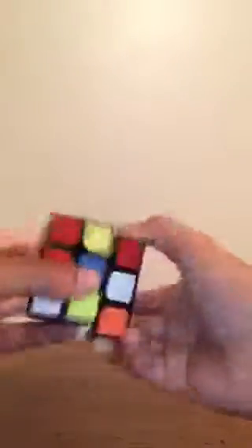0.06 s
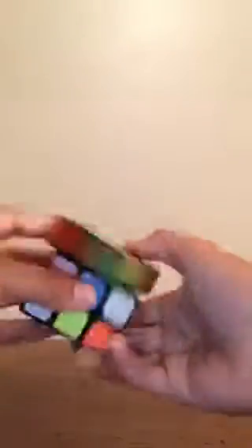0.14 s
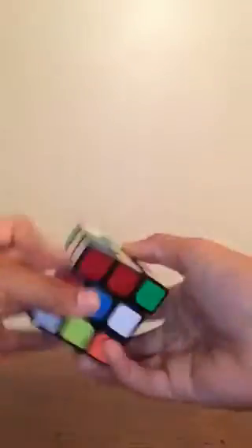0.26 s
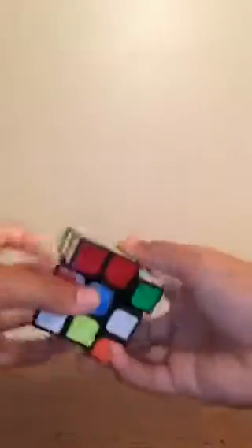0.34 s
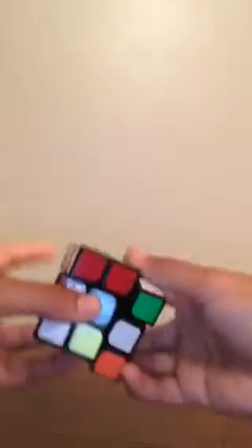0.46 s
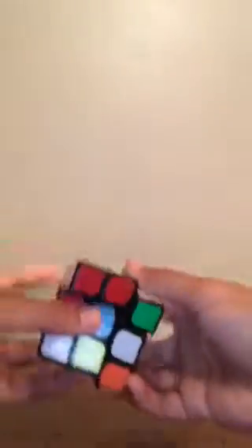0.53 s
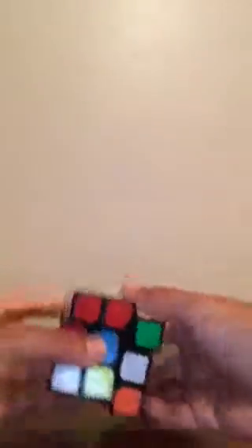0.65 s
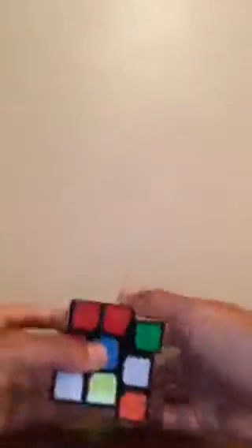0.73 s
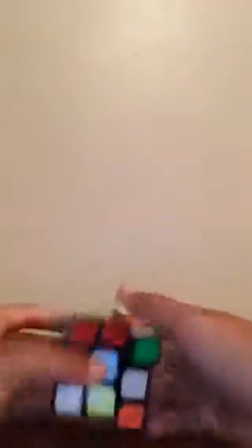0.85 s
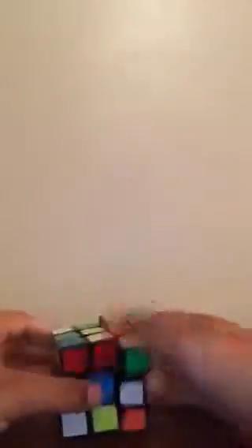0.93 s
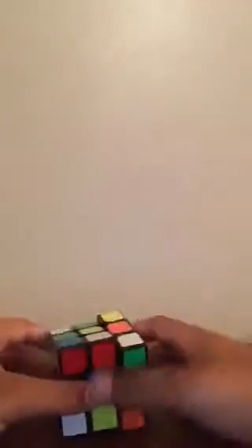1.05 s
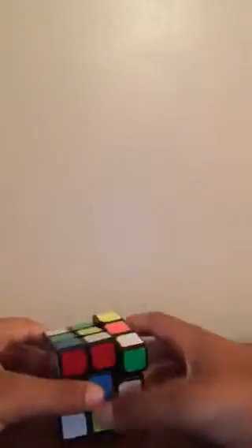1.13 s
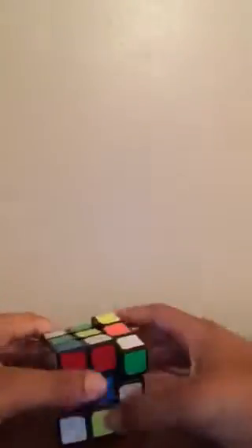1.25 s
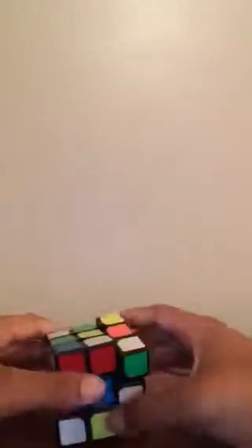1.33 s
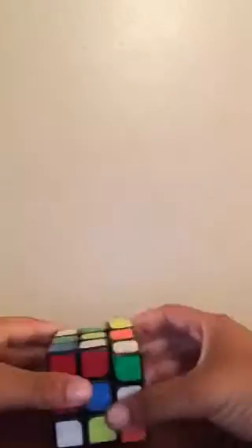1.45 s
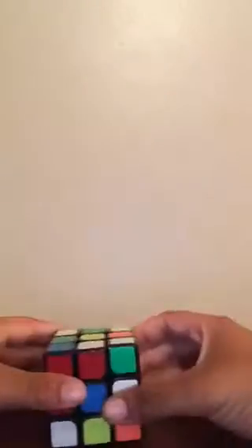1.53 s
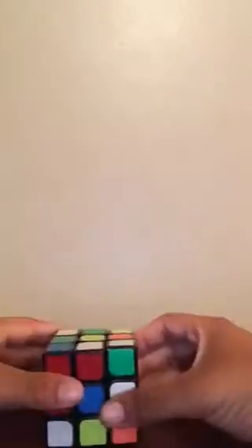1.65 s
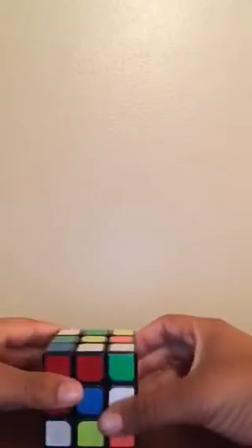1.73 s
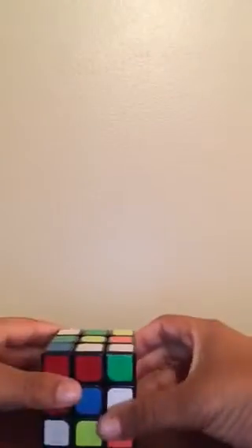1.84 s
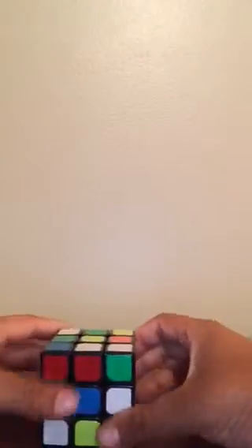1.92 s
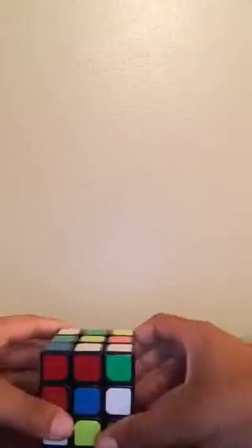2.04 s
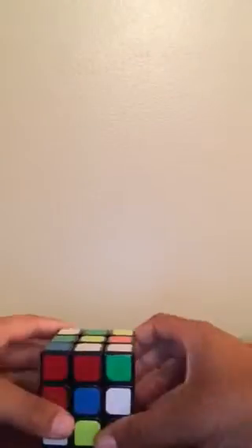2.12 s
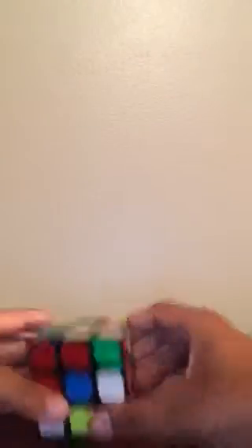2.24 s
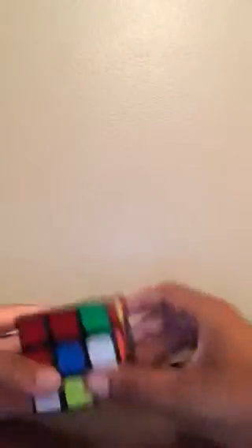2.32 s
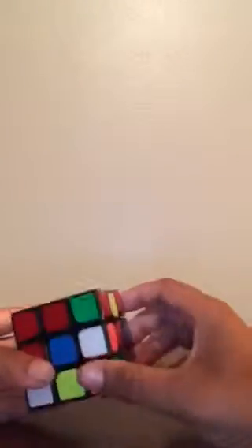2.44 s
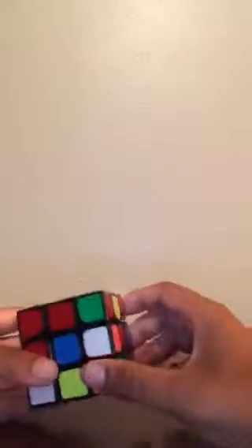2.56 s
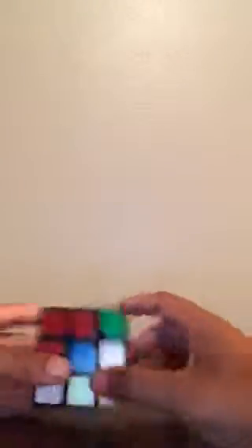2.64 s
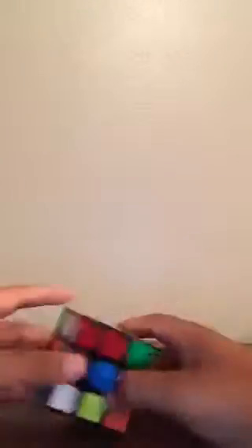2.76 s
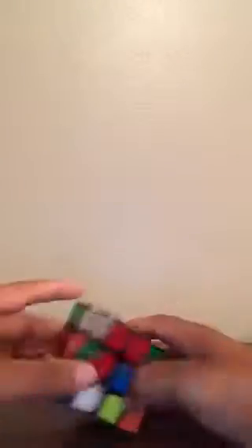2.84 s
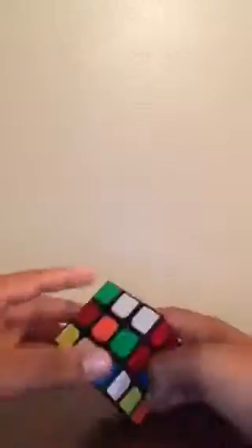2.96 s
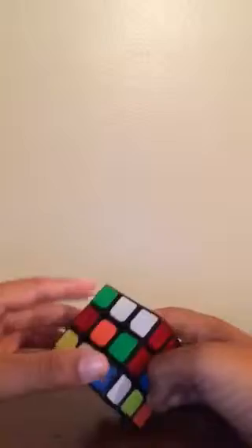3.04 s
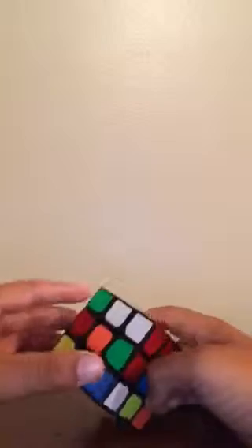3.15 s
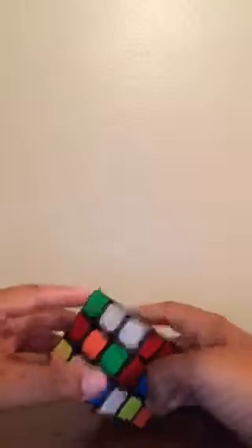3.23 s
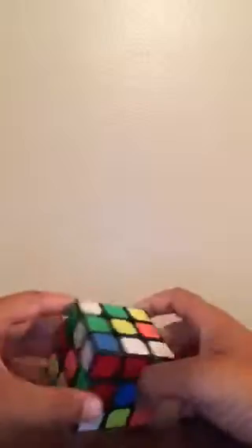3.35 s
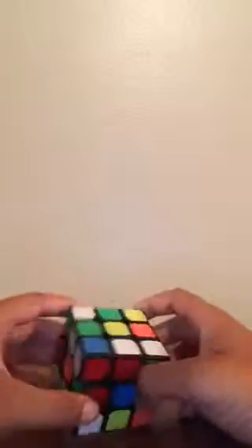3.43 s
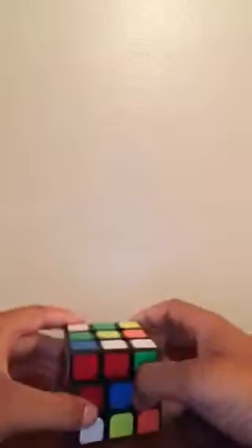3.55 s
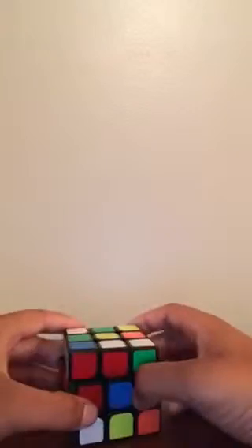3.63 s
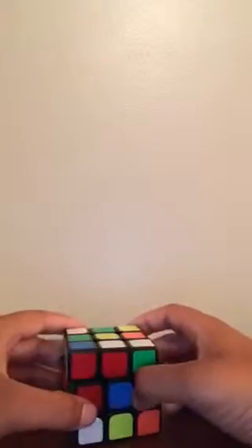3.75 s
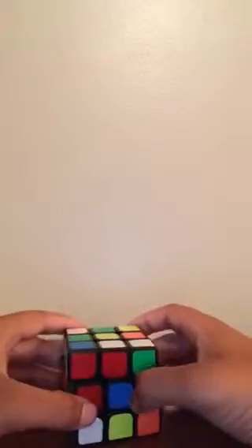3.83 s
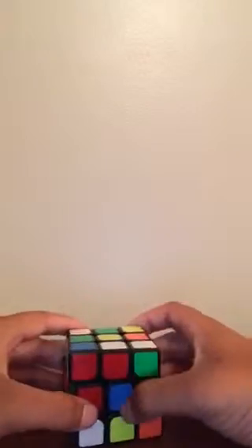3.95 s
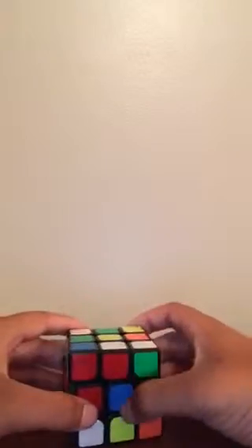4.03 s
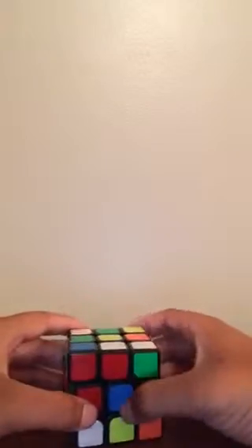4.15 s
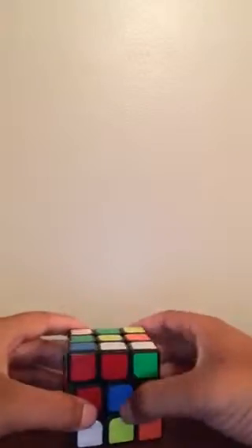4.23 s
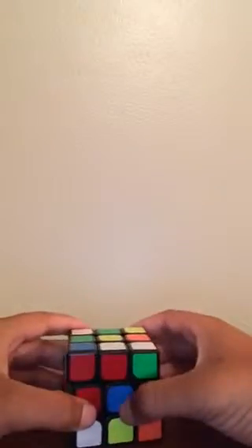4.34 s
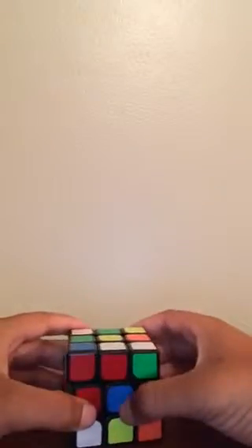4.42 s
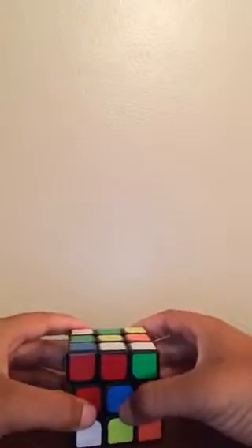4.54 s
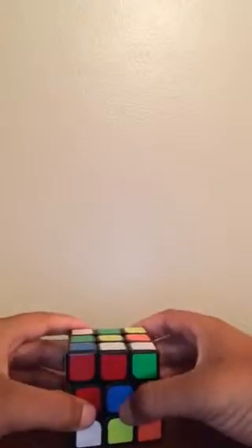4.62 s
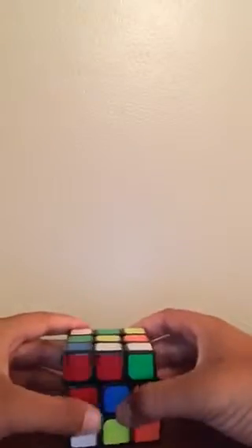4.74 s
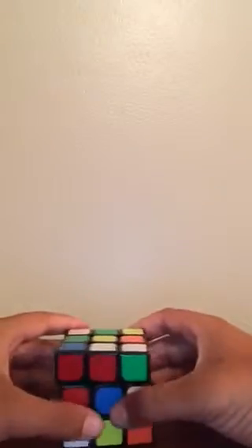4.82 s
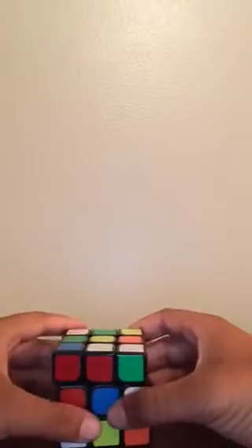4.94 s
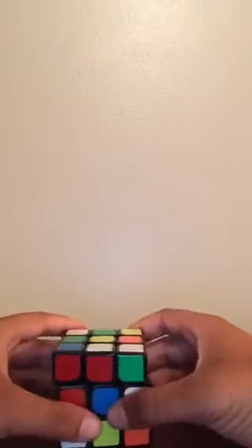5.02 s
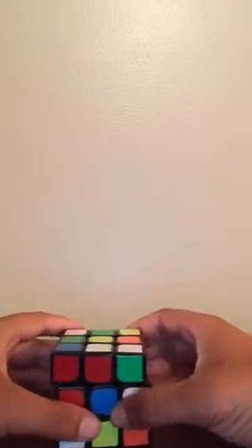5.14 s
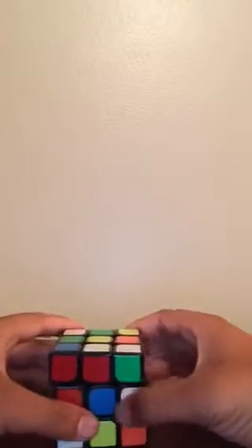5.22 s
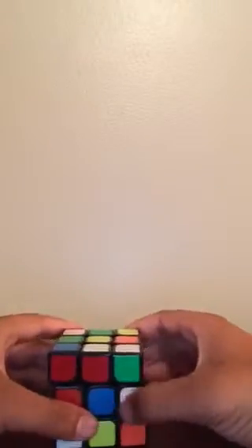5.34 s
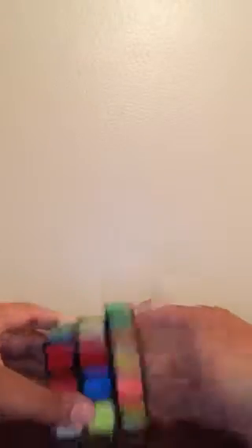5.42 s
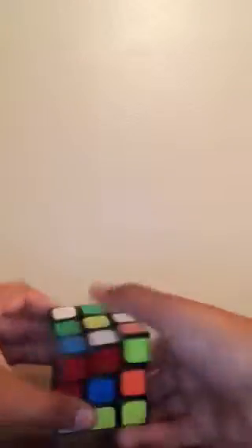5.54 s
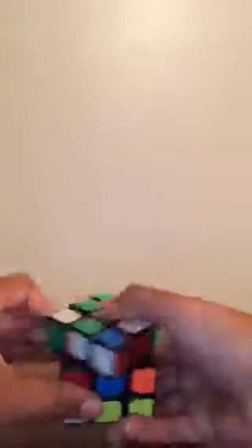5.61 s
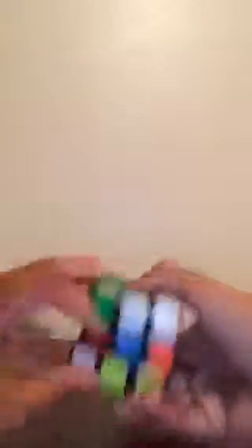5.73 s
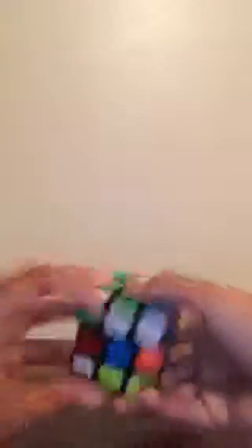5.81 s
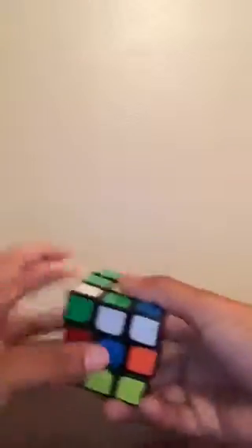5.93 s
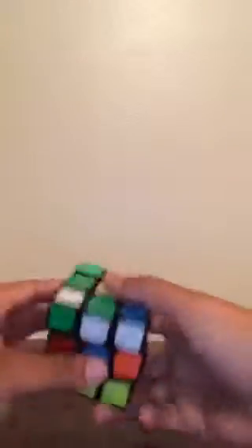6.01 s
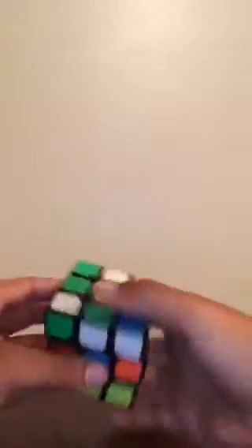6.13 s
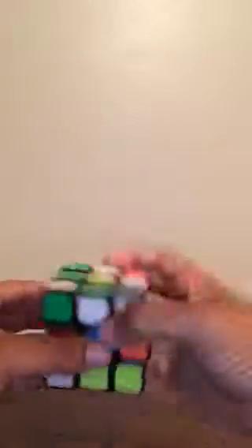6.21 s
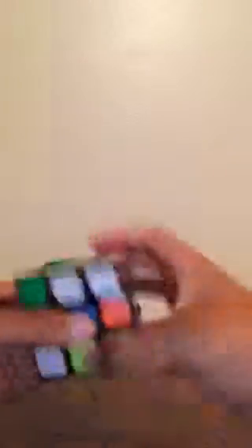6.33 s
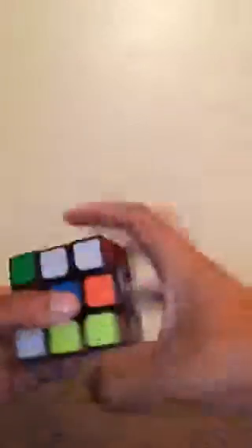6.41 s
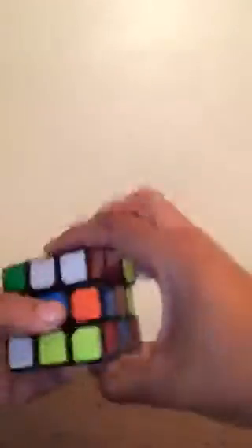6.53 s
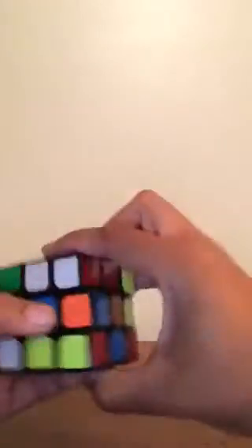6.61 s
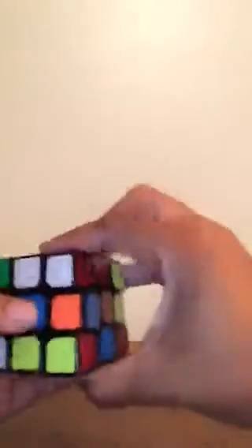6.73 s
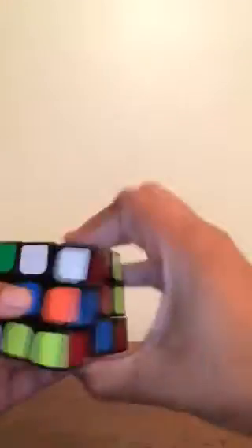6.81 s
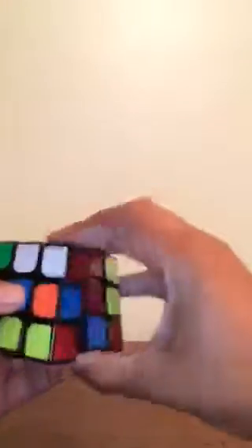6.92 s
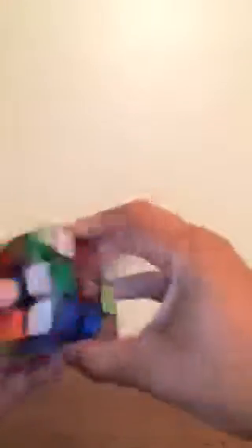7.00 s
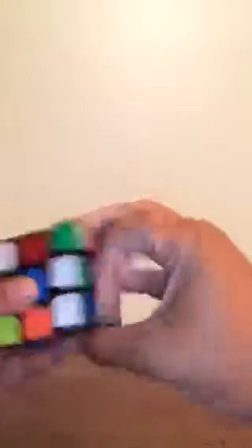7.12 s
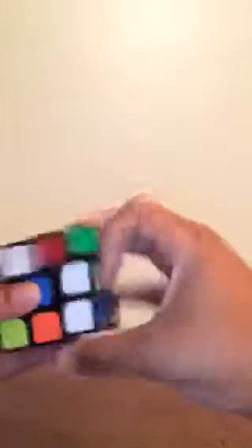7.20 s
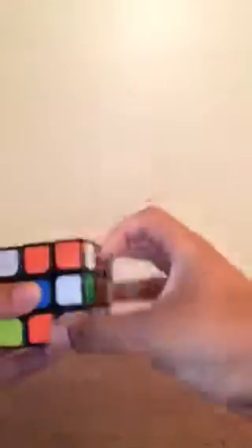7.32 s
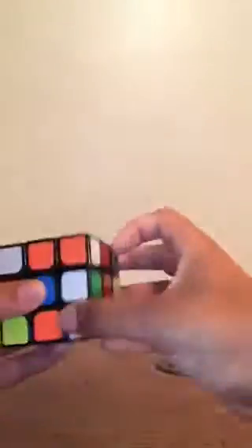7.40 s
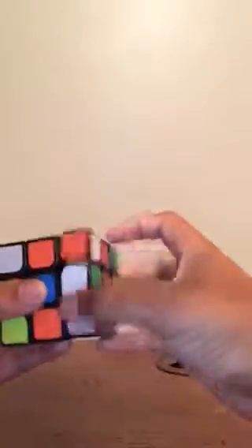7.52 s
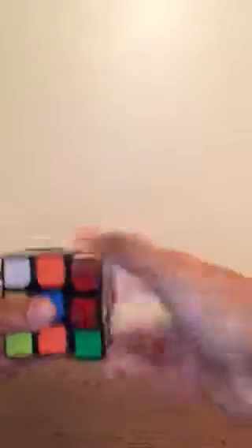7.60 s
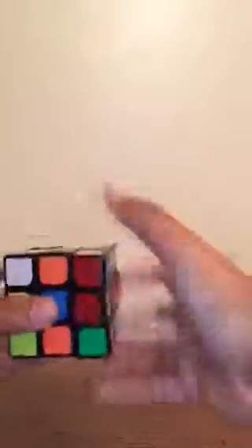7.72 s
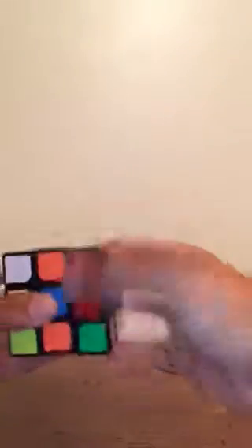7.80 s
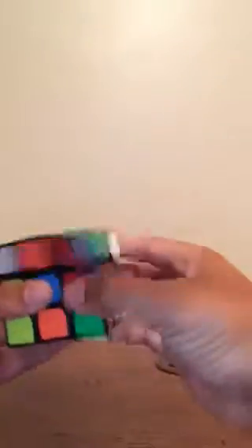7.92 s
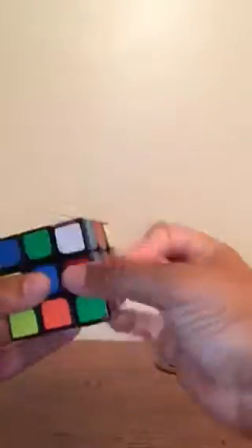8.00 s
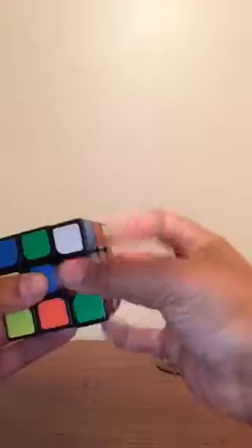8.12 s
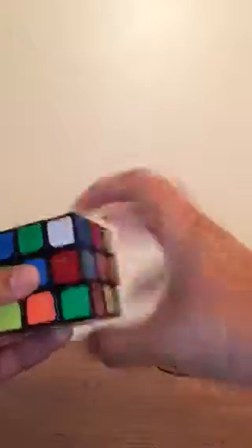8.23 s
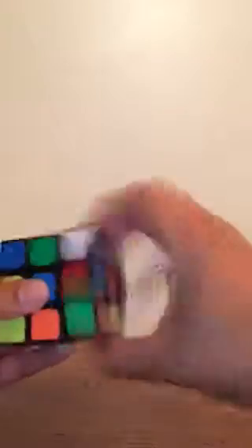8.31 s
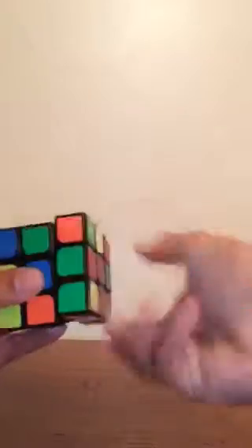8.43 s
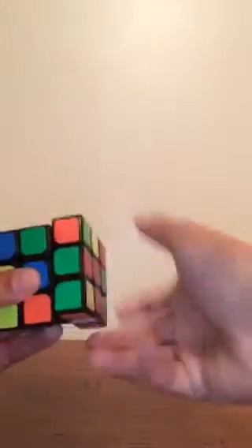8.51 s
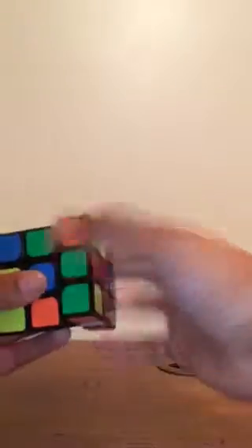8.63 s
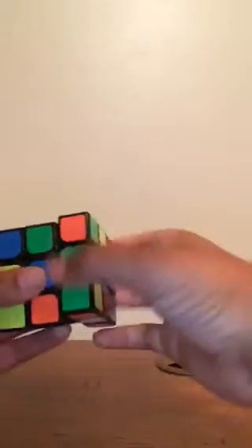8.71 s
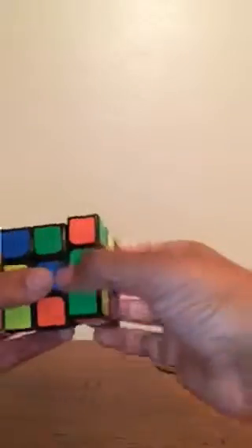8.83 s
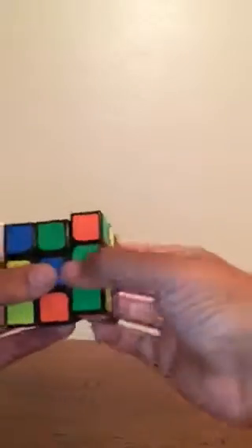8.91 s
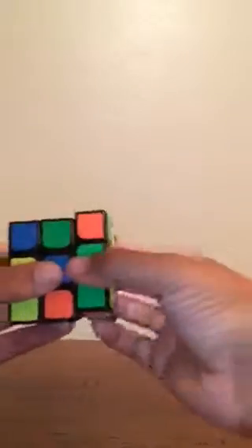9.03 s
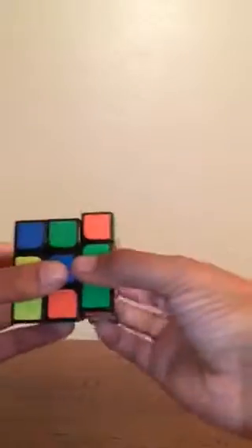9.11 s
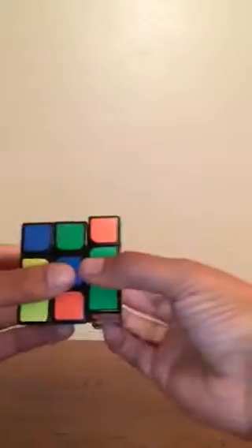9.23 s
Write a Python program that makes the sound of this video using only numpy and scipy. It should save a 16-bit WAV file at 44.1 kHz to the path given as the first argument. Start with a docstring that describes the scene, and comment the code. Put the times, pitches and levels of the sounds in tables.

```python
"""A plastic speedcube is turned by hand close by, in a small room with a low steady hum.
First comes a burst of turns: layers scrape, and loose pieces click as they catch and seat.
Then fingers tap and rub the faces, hands bump, and the cube is knocked on a wooden table.
From 5.5 s the clicks return; near 7 s a tight layer rasps and a dragged fingertip groans.
Dense volleys follow, then a few light contacts. Sounds are shaped noise and decaying sines."""
import sys
import numpy as np
from scipy import signal
from scipy.fft import rfft, irfft, next_fast_len
from scipy.io import wavfile
from scipy.ndimage import uniform_filter1d, map_coordinates

SR = 44100
rng = np.random.default_rng(int(sys.argv[2]) if len(sys.argv) > 2 else 0)


def dump(signal):
    """Clip the signal to [-1, 1] and save it as 16-bit WAV at the path in sys.argv[1]."""
    limited = np.clip(np.atleast_2d(signal).T, -1, 1)
    pcm = np.round(limited * 32767).astype(np.int16)
    wavfile.write(sys.argv[1], SR, pcm)


N = 408366
TIME_S = np.arange(N) / SR

# pieces catching or seating: start_s, level_db, brightness_db_per_octave, ringing_part
CLICKS = [(.058, -33, 1, "wall"), (.089, -28.5, 0, "hollow"), (.111, -33.5, 5.5, "wall"),
          (0.1225, -27, 1, "hollow"), (0.2661, -32, 1, "wall"), (0.2762, -28.5, -0.5, "hollow"),
          (0.2873, -28.5, 2, "wall"), (.298, -34.5, -1.5, "hollow"), (0.3134, -28.5, -0.5, "hollow"),
          (.365, -25, 2, "wall"), (0.3701, -18.5, 1.5, "hollow"), (0.4338, -40, 5, "wall"),
          (0.467, -34, -1.5, "hollow"), (.518, -38.5, .5, "wall"), (.6, -46.5, 2.5, "wall"),
          (0.651, -38.5, 1, "wall"), (0.745, -48, -0.5, "hollow"), (2.763, -47, 3.5, "wall"),
          (3.62, -31.5, 1.5, "wall"), (5.56, -26.5, -4.5, "shell"), (5.585, -17, 0.5, "hollow"),
          (5.593, -23, -0.5, "wall"), (5.651, -34.5, 0.5, "wall"), (5.7026, -26, -7.5, "hollow"),
          (5.7074, -26, 12.5, "shell"), (5.724, -32.5, 5, "wall"), (5.762, -28, -0.5, "hollow"),
          (5.774, -40, -2, "wall"), (5.815, -27, -2.5, "shell"), (5.848, -30.5, -5.5, "shell"),
          (5.865, -22, 1.5, "shell"), (5.876, -30.5, -9, "shell"), (5.895, -31, 0.5, "hollow"),
          (5.96, -33.5, -6, "shell"), (5.986, -36, 2, "wall"), (6.156, -39, -3, "hollow"),
          (6.2568, -38.5, 0, "hollow"), (6.3136, -38.5, -0.5, "hollow"), (6.439, -37.5, 4, "wall"),
          (6.626, -35.5, -4, "hollow"), (6.794, -44, -1.5, "wall"), (6.865, -45.5, 3, "wall"),
          (6.954, -37, 1, "wall"), (6.9753, -32.5, -0.5, "hollow"), (6.989, -32, 1, "hollow"),
          (7.069, -44.5, -2.5, "wall"), (7.16, -18.5, 1, "hollow"), (7.168, -22, 4, "hollow"),
          (7.1798, -20, 7, "wall"), (7.183, -21.5, 3, "hollow"), (7.2, -32.5, 5, "hollow"),
          (7.2912, -37, .5, "hollow"), (7.306, -30, -1, "hollow"), (7.3525, -28, 6, "wall"),
          (7.363, -22, 6, "shell"), (7.369, -14.5, 4.5, "wall"), (7.3738, -20.5, 3.5, "wall"),
          (7.393, -16, 4, "wall"), (7.3959, -20.5, 7.5, "shell"), (7.574, -37, -1.5, "hollow"),
          (7.6895, -23.5, 0.5, "hollow"), (7.7051, -37, 0, "hollow"), (7.7273, -22.5, 1.5, "wall"),
          (7.7602, -27, 0.5, "shell"), (8.0156, -49, -0.5, "wall"), (8.092, -29, -1, "wall"),
          (8.113, -27.5, 0.5, "hollow"), (8.131, -21.5, 1.5, "hollow"), (8.1399, -20.5, 0.5, "hollow"),
          (8.146, -16.5, 8.5, "wall"), (8.3218, -52, 1.5, "wall"), (8.441, -39.5, -1, "shell"),
          (8.473, -23, -0.5, "shell"), (8.495, -15.5, 3.5, "wall"), (8.5115, -15.5, 2.5, "wall"),
          (8.523, -23.5, 2, "wall"), (8.533, -18, 1.5, "hollow"), (8.769, -47, 0.5, "wall"),
          (8.911, -41, 3, "wall"),]
# parts of the cube that a click rings: pitch_hz, level_db (against the click), t60_s
PARTS = {"shell": (1270, 6.1, 0.014), "hollow": (2760, 6, 0.015), "wall": (7100, -3, .008)}
# layers sliding on each other: start_s, end_s, level_db (relative)
SLIDES = [(-.03, .052, -49), (.057, .139, -41), (.275, .34, -32.5), (.345, .44, -46.5), (5.515, 5.625, -32),
          (5.617, 5.911, -47), (5.92, 6.081, -53), (6.74, 6.95, -54), (6.96, 7.03, -46.5),
          (7.125, 7.215, -32.5), (7.31, 7.41, -35.5), (7.456, 7.6, -52), (7.69, 7.78, -39),
          (8.089, 8.16, -39.5), (8.465, 8.551, -36)]
# whole cube set down, tapped or jolted:
# start_s, clack_db, table_db, shell_ring_hz, hand_thud_db (levels relative)
KNOCKS = [(1.0766, -11.5, -26, 3320, -34), (1.087, -14.5, -21, 2260, -29), (1.548, -41, -39.5, 1290, -58),
          (1.731, -36.5, -38.5, 1530, -40), (1.8876, -36, -39.5, 2795, -51),
          (2.8598, -12.5, -21, 2880, -40), (2.942, -26.5, -39, 1416, -39),
          (3.2229, -41.5, -35.5, 1650, -37.5), (3.619, -25.5, -26, 1466, -34),
          (3.7834, -45, -43.5, 1323, -53), (5.534, -21.5, -30.5, 2287, -41)]
# modes of the wooden table: pitch_hz, level_db (relative), t60_s
TABLE_MODES = [(238, -7.5, .05), (353.7, 2, 0.089), (403, 1, .07)]
# fingertips landing on a face: start_s, level_db
TAPS = [(.223, -42), (.863, -48.5), (1.012, -34), (1.835, -45), (2.09, -46.5), (2.346, -55),
        (2.3812, -46.5), (2.445, -48), (2.621, -59), (3.3963, -48), (3.417, -48), (3.456, -38),
        (4.574, -51), (5.299, -58.5), (6.216, -49.5), (6.58, -48.5), (8.2762, -46), (9.209, -53.5)]
# fingers brushing the faces: start_s, end_s, level_db (relative)
RUBS = [(1.01, 1.56, -61.5), (1.47, 1.73, -55.5), (2.4, 2.54, -53.5), (2.78, 2.87, -58), (3.38, 3.5, -58),
        (3.99, 4.09, -60), (4.87, 5.02, -59)]
# tight layer rasping: start_s, end_s, level_db
SQUEAK = (6.885, 6.935, -48)
# soft bumps of the hands alone: start_s, level_db (relative)
BUMPS = [(.864, -45.5), (1.207, -33), (1.245, -39), (1.397, -44), (1.43, -43), (2.428, -37), (2.466, -37.5),
         (8.15, -44.5), (8.339, -40)]
# colour of one loose piece: frequency_hz, level_db (relative)
PIECE_COLOUR = [(100, -24), (700, -14.5), (1300, -5), (1800, -9), (3000, -5.5), (5300, -9.5), (7500, -7),
                (9000, -15.5), (15000, -27.5)]
# colour of the whole cube: frequency_hz, level_db (relative)
CUBE_COLOUR = [(150, -17.5), (600, -7.5), (900, -11), (1400, 0.5), (3000, -1), (4000, -5.5), (7600, -11.5),
               (15000, -34)]
# colour of skin on plastic: frequency_hz, level_db (relative)
SKIN_COLOUR = [(300, -26.5), (1400, 3.5), (2500, -4.5), (7000, -9), (15000, -25)]
# colour of the hands' thud: frequency_hz, level_db (relative)
HAND_COLOUR = [(20, -24.5), (60, -4), (170, 2), (420, -10.5), (750, -21.5), (1300, -24.5), (12000, -56.5)]
# colour of the room air: frequency_hz, level_db (relative)
AIR_COLOUR = [(25, -35), (59, -11.5), (96, -14), (140, -3.5), (349, -8), (410, -5.5), (666, -21.5),
              (1570, -29), (15500, -53)]
# narrow bands in the room's hum: centre_hz, level_db
HUM = [(141, -68), (416, -64)]
# decay of the room: frequency_hz, t60_s
ROOM_DECAY = [(200, 0.38), (3000, 0.21), (15000, 0.15)]

# graze just before a click, rebound just after: lead or lag, level against the click
GRAZE_S, GRAZE_DB = .004, -11
REBOUND_S, REBOUND_DB = .0033, -8
RUN_GAP_S = .07  # clicks closer than this belong to one run
# what graze and rebound lose for each dB that a click is below a hard one
SOFTER_DB_PER_DB, HARD_DB = 0.2, -18.5
# random ticks: rate, level against the slide, spread
TICKS_PER_S, TICK_DB, TICK_SCATTER_DB = 150, -2, 5.5
PITCH_SCATTER, UNEVEN_DB = .08, 3.8  # half range of log pitch; spread of wall resonances
TABLE_SCATTER = 0.017  # log-pitch spread: the modes shift with the spot that is struck
FACE_HZ, FACE_DB, FACE_T60_S = 1450, 4.5, 0.021  # closed cube under a fingertip
SQUEAK_HZ, SQUEAK_WIDTH_HZ = 3106, 2000
GROAN_S, GROAN_LENGTH_S, GROAN_RAMP_S = 7.035, 0.25, 0.05  # ramp at both ends
GROAN_HZ, GROAN_SAG_HZ_PER_S = 162, 260
GROAN_DB, GROAN_FADE_DB_PER_S = -34, 65
ROOM_DB, AIR_DB = -13.0, -51.5
TOP_HZ = 15600


def clicks():
    """Corner and edge pieces snap into line and rebound; within a run they also graze just before."""
    out, previous_s = np.zeros(N), -np.inf
    for start_s, level_db, bright, part in CLICKS:
        loose_db = level_db + looseness_db(level_db)
        timing = np.exp(rng.uniform(-.5, .5, 2))
        graze_s, rebound_s = np.array([GRAZE_S, REBOUND_S]) * timing
        contacts = [(start_s, level_db), (start_s + rebound_s, loose_db + REBOUND_DB)]
        if start_s - previous_s < RUN_GAP_S:
            contacts.append((start_s - graze_s, loose_db + GRAZE_DB))
        for contact_s, contact_db in contacts:
            contact = impact(PIECE_COLOUR, bright, t60_s=.009, uneven_db=UNEVEN_DB)
            add(out, contact_s, amp(contact_db) * contact)
        add(out, start_s, amp(level_db) * ring(*PARTS[part]))
        previous_s = start_s
    return out


def looseness_db(level_db):
    """How much a click of this level shakes its neighbours, against a hard click; never above 0."""
    return min(SOFTER_DB_PER_DB * (level_db - HARD_DB), 0)


def ring(pitch_hz, level_db, t60_s):
    """One part of the cube rings briefly as a decaying sine, its pitch scattered at each call."""
    t = np.arange(SR // 25) / SR
    scattered_hz = pitch_hz * np.exp(PITCH_SCATTER * rng.uniform(-1, 1))
    onset = 1 - np.exp(-t / 0.00047)
    return amp(level_db - 60 * t / t60_s) * np.sin(2 * np.pi * scattered_hz * t) * onset


def ticks(count=2200):
    """Loose pieces tick at random, each with its own colour, as hard as the layers slide."""
    out, effort = np.zeros(N), strokes(SLIDES)
    keep_chance = TICKS_PER_S * N / SR / count
    draws = np.c_[rng.random((count, 2)), rng.standard_normal((count, 2))]
    for place, chance, size, bright in draws:
        if chance < keep_chance:
            tick = impact(PIECE_COLOUR, 3 * bright - 1, t60_s=0.007, uneven_db=6.5, size=512)
            tick_db = TICK_DB + TICK_SCATTER_DB * min(size, 1)
            add(out, place * N / SR, effort[int(place * N)] * amp(tick_db) * tick)
    return out


def slides():
    """Sliding layers scrape faintly; pieces also scrape just before they seat and chatter after."""
    t = np.arange(-SR // 20, SR // 20) / SR
    swell = np.where(t < 0, np.exp(t / 0.01), np.exp(-t / 0.007))
    seating = np.zeros(N)
    for start_s, level_db, *_ in CLICKS:
        before_gain = np.where(t < 0, amp(looseness_db(level_db)), 1)
        add(seating, start_s + t[0], amp(level_db - 15.0) * swell * before_gain)
    scrape = coloured(slips(rate_per_s=380, spread_db=24.5, life_s=0.0005, bed_db=-16.5), PIECE_COLOUR)
    return (amp(-5) * strokes(SLIDES) + seating) * scrape


def knocks(count=4):
    """The whole cube clacks and rings briefly, and the table top booms under it."""
    out, t = np.zeros(N), np.arange(SR // 4) / SR
    for start_s, clack_db, table_db, ring_hz, _ in KNOCKS:
        # harder blows are brighter
        clack = impact(CUBE_COLOUR, 0.17 * (clack_db + 10.0), t60_s=.015, uneven_db=1)
        add(out, start_s, amp(clack_db - 2) * clack)
        # near-equal pieces ring together, each a little off the others
        pitches_hz = ring_hz * np.exp(PITCH_SCATTER * rng.uniform(-1, 1, (count, 1)))
        shell = np.sin(2 * np.pi * pitches_hz * t).mean(0) * (1 - np.exp(-t / .0004))
        add(out, start_s, amp(clack_db + 4.5 - 60 * t / 0.028) * shell)
        # the jolt leaves the loose pieces buzzing in spurts around that note
        buzz = coloured(rng.standard_normal(len(t)), CUBE_COLOUR)
        buzz = buzz + .5 * wavering(ring_hz, 600, len(t))
        spurts = unit(buzz * amp(5.5 * wobble(140, len(t))))
        add(out, start_s, amp(clack_db - 21.5 - 60 * t / 0.18) * spurts)
        wood = np.zeros(len(t))
        for mode_hz, mode_db, t60_s in TABLE_MODES:
            decay = amp(mode_db + rng.normal(0, 1) - 60 * t / t60_s)
            shifted_hz = mode_hz * np.exp(TABLE_SCATTER * rng.standard_normal())
            wood += decay * np.sin(2 * np.pi * shifted_hz * t)
        add(out, start_s, amp(table_db + 4.5) * wood * (1 - np.exp(-t / 0.0028)))
    return out


def taps():
    """A fingertip lands on a face: a soft tick and the short, hollow note of the closed cube."""
    out = np.zeros(N)
    for start_s, level_db in TAPS:
        tick = impact(SKIN_COLOUR, 0, t60_s=0.0051, uneven_db=UNEVEN_DB)
        add(out, start_s, amp(level_db) * tick)
        add(out, start_s, amp(level_db) * ring(FACE_HZ, FACE_DB, FACE_T60_S))
    return out


def squeak():
    """A tight layer binds for an instant and rasps at one of the cube's resonances."""
    return strokes([SQUEAK]) * wavering(SQUEAK_HZ, SQUEAK_WIDTH_HZ)


def groan():
    """Skin sticks and slips on the face, slower and softer until the finger comes to rest."""
    t = np.clip(TIME_S - GROAN_S, 0, GROAN_LENGTH_S)
    pitch_hz = (GROAN_HZ - GROAN_SAG_HZ_PER_S * t) * (1 + 0.024 * wobble(90))
    phase = 2 * np.pi * np.cumsum(pitch_hz) / SR
    # half pitch: alternate slips differ in size
    wave = np.sin(phase) + amp(-13.5) * (np.sin(2 * phase) + np.sin(phase / 2))
    gate = np.minimum(np.minimum(t, GROAN_LENGTH_S - t) / GROAN_RAMP_S, 1)
    level_db = GROAN_DB - GROAN_FADE_DB_PER_S * t + 1.9 * wobble(60)
    return gate * amp(level_db) * unit(wave)


def rubs():
    """Skin drags over the faces in small, uneven catches, duller than plastic on plastic."""
    catches = slips(rate_per_s=300, spread_db=14, life_s=.0018, bed_db=-5)
    return strokes(RUBS) * coloured(catches, SKIN_COLOUR)


def bumps():
    """Flesh on wood and plastic: dull, shuddering thuds, and one short push behind each knock."""
    out, t = np.zeros(N), np.arange(SR // 4) / SR
    fade = amp(-60 * t / .15) * (1 - np.exp(-t / .002))
    for start_s, level_db in BUMPS:
        thud = coloured(rng.standard_normal(len(t)), HAND_COLOUR)
        add(out, start_s, amp(level_db + 6.0) * fade * thud)
    for start_s, *_, thud_db in KNOCKS:
        push = impact(HAND_COLOUR, 0, t60_s=0.022, uneven_db=3)
        add(out, start_s, amp(thud_db + 10.0) * push)
    return out


def room(x, wet_db, answers=8):
    """The walls answer with decaying noise; the answer changes as the cube moves about in the hands."""
    out = np.zeros(N)
    for k in range(answers):
        hz, t, bins = signal.stft(rng.standard_normal(SR // 2), SR, nperseg=256)
        decay = amp(-60 * t / along(ROOM_DECAY, hz)[:, None]) * (1 - np.exp(-t / 0.0051))
        tail = signal.istft(bins * decay, SR, nperseg=256)[1]
        # whole seconds split into equal slots, each answer taking its slot in turn
        here = (TIME_S * answers).astype(int) % answers == k
        out += signal.oaconvolve(x * here, tail / np.linalg.norm(tail))[:N]
    return amp(wet_db) * out


def air():
    """Steady low room noise with two wavering bands of hum."""
    hum = sum(amp(level_db) * wavering(centre_hz, 25) for centre_hz, level_db in HUM)
    return amp(AIR_DB) * coloured(rng.standard_normal(N), AIR_COLOUR) + hum


def impact(colour, bright, t60_s, uneven_db, size=2048, count=48):
    """One contact: a snap and brief chatter through hollow plastic; energy of 5 ms at rms 1."""
    t, hz = np.arange(size) / SR, np.fft.rfftfreq(size, 1 / SR)
    chatter_db = 2.9 * rng.standard_normal(size) - 60 * t / t60_s
    force = rfft(rng.standard_normal(size) * amp(chatter_db) * (1 - np.exp(-t / 0.00024)))
    # hard contacts drive all bands alike; the piece and its own wall resonances give the colour
    flatten_db = -10 * np.log10(np.abs(uniform_filter1d(np.abs(force) ** 2, size=40)) + 1e-9)
    knots = np.linspace(np.log(300), np.log(16000), count)
    walls = np.interp(np.log(hz + 1), knots, rng.standard_normal(count))
    tilt_db = bright * np.log2(np.clip(hz, 1000, 11000) / 4000)
    gain_db = along(colour, hz) + flatten_db + uneven_db * walls + tilt_db
    # minimum phase: folded forward, so that nothing rings before the blow
    cepstrum = irfft(np.log(amp(gain_db)))
    cepstrum[1:size // 2] *= 2
    cepstrum[size // 2 + 1:] = 0
    return unit(irfft(force * np.exp(rfft(cepstrum)))) * np.sqrt(.005 * SR / size)


def slips(rate_per_s, spread_db, life_s, bed_db):
    """Tiny catches at random moments over a smooth bed of friction noise."""
    energy = (rng.random(N) < rate_per_s / SR) * amp(-spread_db * rng.random(N)) ** 2
    energy = signal.lfilter([1], [1, -np.exp(-1 / (life_s * SR))], energy)
    return rng.standard_normal(N) * (unit(np.sqrt(np.abs(energy))) + amp(bed_db))


def strokes(rows):
    """A level that swells and fades over each (start_s, end_s, level_db) stroke."""
    out = np.zeros(N)
    for start_s, end_s, level_db in rows:
        progress = np.clip((TIME_S - start_s) / max(end_s - start_s, .01), 0, 1)
        out += amp(level_db) * np.abs(np.sin(np.pi * progress)) ** 0.86
    return out


def wavering(centre_hz, width_hz, size=N):
    """A resonance shaken at random: a narrow band around its centre, about width_hz wide."""
    phase = 2 * np.pi * centre_hz * TIME_S[:size]
    return wobble(width_hz, size) * np.sin(phase) + wobble(width_hz, size) * np.cos(phase)


def wobble(knots_per_s, size=N):
    """A smooth random curve through normally distributed knots."""
    knots = rng.standard_normal(int(size * knots_per_s / SR) + 4)
    return map_coordinates(knots, [TIME_S[:size] * knots_per_s])


def coloured(x, points):
    """Filter x by a colour table, at rms 1."""
    size = next_fast_len(len(x))
    gain = amp(along(points, np.fft.rfftfreq(size, 1 / SR)))
    return unit(irfft(rfft(x, size) * gain, size)[:len(x)])


def along(points, hz):
    """Read (frequency_hz, value) points on a log frequency axis."""
    point_hz, values = np.transpose(points)
    return np.interp(np.log(hz + 1), np.log(point_hz), values)


def amp(db):
    """Decibels to gain."""
    return 10 ** (np.asarray(db) / 20)


def unit(x):
    """Scale to rms 1."""
    return x / np.sqrt(np.mean(x ** 2) + 1e-20)


def add(track, start_s, sound):
    """Mix a sound into the track."""
    start = max(round(start_s * SR), 0)
    track[start:start + len(sound)] += sound[:N - start]


def scene():
    """The cube close by and its room answer, with hand thuds, groan and air left dry."""
    cube = clicks() + ticks() + slides() + knocks() + taps() + squeak() + rubs()
    return (cube + room(cube, ROOM_DB) + bumps() + groan() + air())[None]


def record(dry):
    """The recorder rounds off the tallest peaks and cuts the band over 500 Hz around TOP_HZ."""
    held = dry / (1 + (dry / .78) ** 4) ** .25
    size = next_fast_len(N + SR // 4)
    edge = np.clip((TOP_HZ - np.fft.rfftfreq(size, 1 / SR)) / 500 + .5, 0, 1) ** 2
    return irfft(rfft(held, size) * edge, size)[:, :N]


dry = scene()
out = record(dry)
dump(out)
```